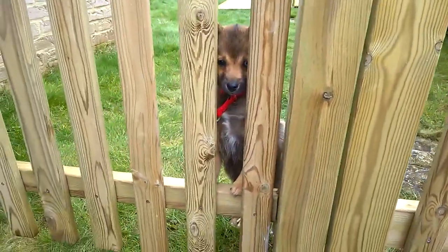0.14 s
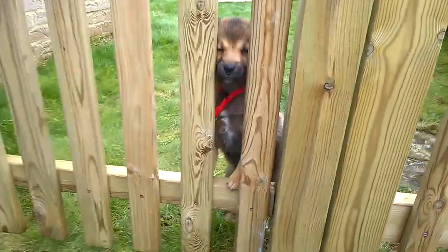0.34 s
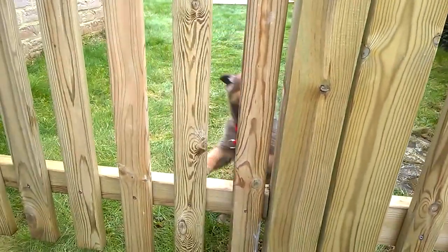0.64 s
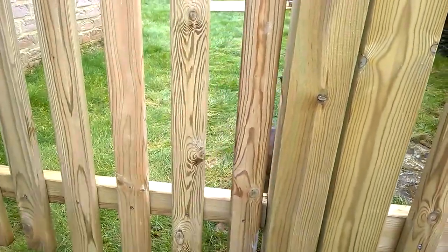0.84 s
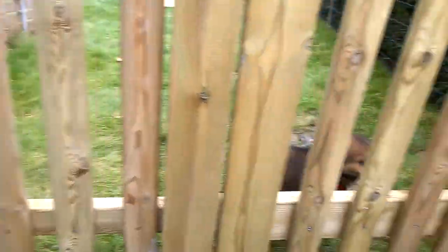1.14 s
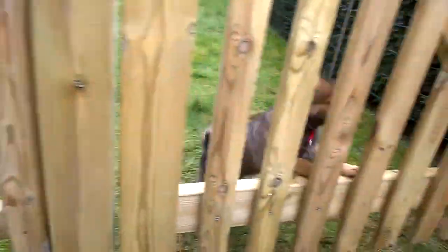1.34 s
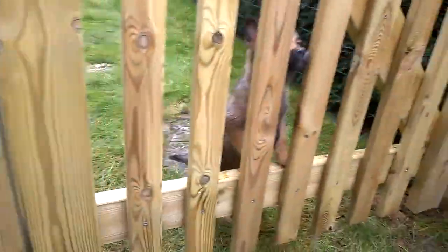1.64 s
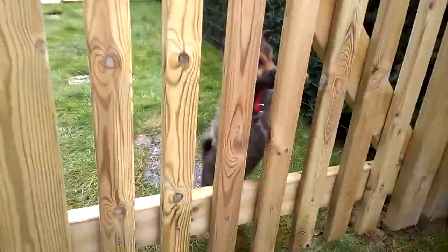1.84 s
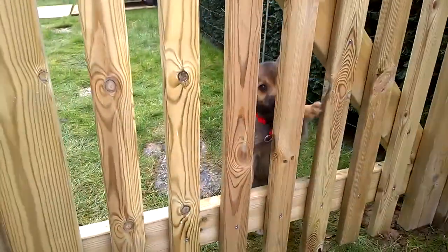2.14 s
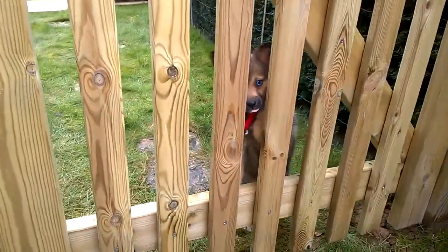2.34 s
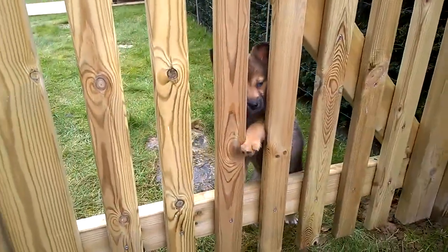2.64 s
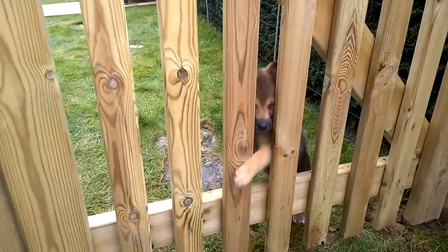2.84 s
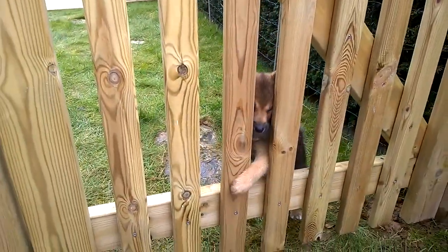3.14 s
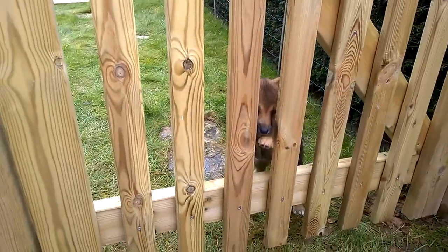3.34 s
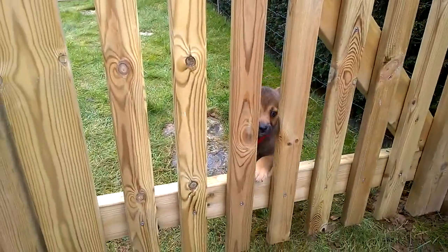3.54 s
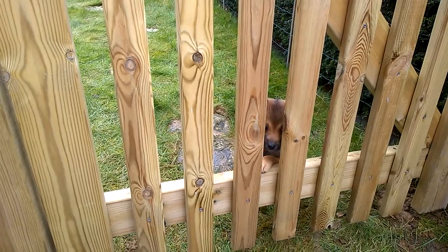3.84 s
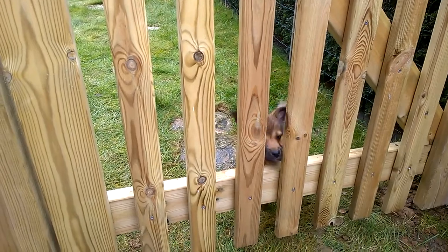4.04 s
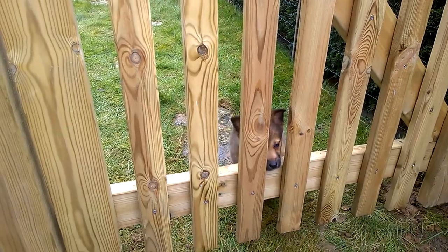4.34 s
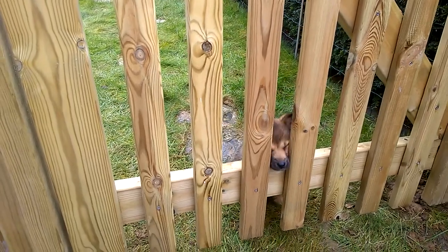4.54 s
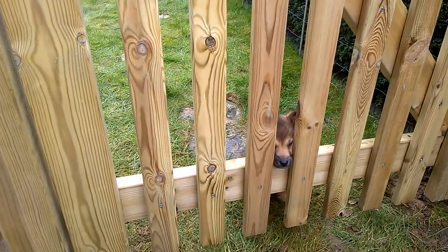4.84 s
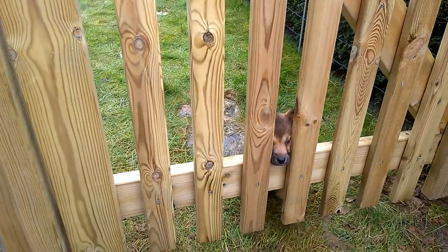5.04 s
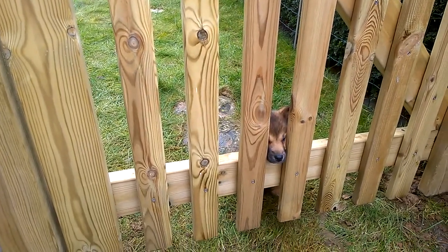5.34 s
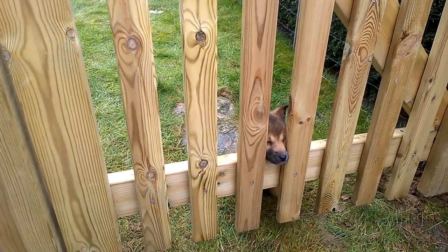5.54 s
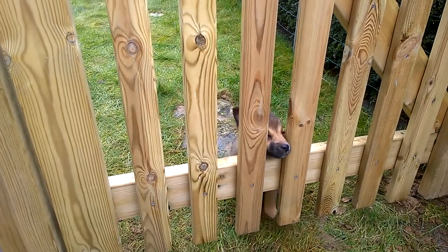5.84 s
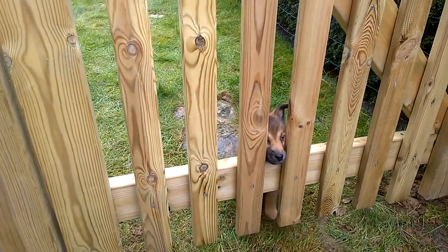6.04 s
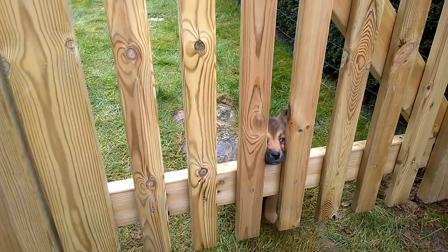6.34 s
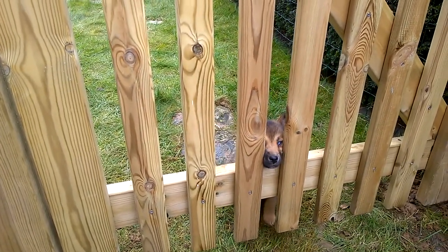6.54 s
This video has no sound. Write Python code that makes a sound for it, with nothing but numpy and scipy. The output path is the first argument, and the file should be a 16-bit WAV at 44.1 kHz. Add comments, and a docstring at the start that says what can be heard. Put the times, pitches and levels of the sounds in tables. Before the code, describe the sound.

Low wind buffeting and bumps on the microphone open the scene with a high, rough puppy yip, followed by a broken yap and a short raspy growl as claws scratch dry wood. Thin quavering whines lead to a second sharp yip. Later come small whimpers, another whine and barely audible nasal whistles, with light fence reflections and calm garden air.

```python
"""A puppy behind a wooden garden fence yips twice, yaps, growls, whimpers, whines and whistles through its nose.
Its voice is summed from harmonics, jittered and mixed with noise puffs where rough; whines and whistles are near-sines.
Its claws scratch the slats in runs of clicks and noise; sparse reflections throw voice and scratches back.
Wind (shaped noise in gusts) and bumps (short pressure swings) rumble on the microphone over faint outdoor noise."""
import sys
import numpy as np
from scipy import signal
from scipy.fft import rfft, irfft, next_fast_len
from scipy.io import wavfile
from scipy.ndimage import uniform_filter1d

SR = 44100
rng = np.random.default_rng(int(sys.argv[2]) if len(sys.argv) > 2 else 0)


def output_pcm(signal):
    """Save a mono or channel-first signal as 16-bit PCM at the path in sys.argv[1].

    Samples are clipped to [-1, 1] before scaling.
    """
    pcm = np.clip(np.atleast_2d(signal).T, -1, 1) * 32767
    wavfile.write(sys.argv[1], SR, np.round(pcm).astype(np.int16))


N = 294662
TIME = np.arange(N) / SR
EDGE_HZ = 15750  # top of the band
SWELL_ROUNDNESS = 1.34  # crest of a cry's level: 1 pointed, 2 a smooth arch

# short growl: t/s, level/dB, mouth opening/factor on the throat resonances
GROWL_CURVES = [(1.325, -54, 1.22), (1.342, -40.5, 1.22), (1.378, -41.5, 1.03), (1.43, -42.5, 0.85),
                (1.475, -39, 0.96), (1.515, -34, 0.947), (1.535, -52, 1.16), (1.558, -38, 1.25),
                (1.582, -66, 1.1)]


def amp(db):
    """Decibels to gain."""
    return 10 ** (np.asarray(db) / 20)


def unit(x):
    """Scales to rms 1."""
    return x / np.sqrt(np.mean(x ** 2) + 1e-20)


def read(points, hz):
    """Reads a spectrum in dB on a log-frequency axis."""
    f, db = np.transpose(points)
    return np.interp(np.log(hz + 1), np.log(f), db)


def colour(x, points):
    """Filters x by a spectrum in dB."""
    size = next_fast_len(len(x) + 2048)
    gain = amp(read(points, np.fft.rfftfreq(size, 1 / SR)))
    return irfft(rfft(x, size) * gain, size)[:len(x)]


def flutter(size, hz):
    """Random motion of rms 1, no faster than about hz."""
    f = np.fft.rfftfreq(size, 1 / SR)
    slow = rfft(rng.standard_normal(size)) / np.sqrt(1 + (f / hz) ** 6)
    return unit(irfft(slow, size))


def steady(x):
    """Holds the short-time rms at 1."""
    return x / np.sqrt(abs(uniform_filter1d(x ** 2, size=500)) + 1e-12)


def add(mix, start_s, sound):
    """Mixes a sound in at start_s."""
    part = mix[max(round(start_s * SR), 0):][:len(sound)]
    part += sound[:len(part)]


def controls(rows):
    """Turns a call's rows into a soft-edged gate and smooth curves."""
    row_s, *columns = np.transpose(rows)
    t = np.arange(row_s[0], row_s[-1], 1 / SR)
    gate = signal.windows.tukey(len(t), 300 / len(t))
    return [gate] + [uniform_filter1d(np.interp(t, row_s, c), size=160) for c in columns]


def note(length_s, crest, first_hz, middle_hz, last_hz, edge_db):
    """One cry: pitch bends in a single arc, level swells to a crest and fades. Gives gate, Hz, dB."""
    u = np.linspace(0, 1, round(length_s * SR))
    bend_hz = middle_hz - (first_hz + last_hz) / 2
    hz = first_hz + (last_hz - first_hz) * u + bend_hz * (1 - (2 * u - 1) ** 2)
    crest = np.clip(crest, .05, .95)
    away = np.maximum((crest - u) / crest, (u - crest) / (1 - crest))
    gate = signal.windows.tukey(len(u), 300 / len(u))
    return gate, hz, edge_db * away ** SWELL_ROUNDNESS


def resonate(x, hz, width_hz):
    """A resonance that follows the curve hz: shift to 0 Hz, low-pass, shift back."""
    turn = np.exp(2j * np.pi * np.cumsum(hz) / SR)
    r = np.exp(-np.pi * width_hz / SR)
    return 2 * (turn * signal.lfilter([1 - r], [1, -r], x / turn)).real


def air(level_db=-51, waver_db=1.1, waver_hz=14):
    """Dull, even outdoor noise with a few narrow humps."""
    # steady spectrum: f/Hz, level/dB
    air_spectrum = [(60, 2), (200, 3.5), (350, -6), (600, -2), (900, 4), (1300, 0), (1600, -2.5),
                    (2100, 0.5), (2430, -20.5), (3000, -19), (3700, -27.5), (6800, -32), (8200, -37.5),
                    (15500, -43)]
    # humps on it: f/Hz, width/Hz, rise/dB
    air_humps = [(2007, 66, 5.25), (4270, 380, 9), (6130, 160, 6.5), (10420, 270, 10)]
    hz = np.fft.rfftfreq(N, 1 / SR)
    humps_db = sum(up_db * np.exp(-((hz - f) / width) ** 2) for f, width, up_db in air_humps)
    db = read(air_spectrum, hz) + humps_db
    noise = unit(irfft(rfft(rng.standard_normal(N)) * amp(db), N))
    return amp(level_db + waver_db * flutter(N, waver_hz)) * noise


def gusting(wander_db=2, wander_hz=9):
    """Wind strength in dB: bell-shaped gusts on a wandering breeze, summed as power."""
    # gusts on the microphone: crest t/s, length/s, level/dB
    gust_rows = [(0.01, 0.11, -23.5), (0.341, .11, -25.5), (0.542, 0.19, -31), (0.668, 0.2, -19),
                 (1.02, 0.29, -29), (1.151, 0.064, -26.5), (1.273, 0.087, -24), (1.391, 0.051, -33),
                 (1.614, .07, -32), (1.74, 0.037, -30.5), (1.933, 0.17, -29), (2.87, 0.041, -37),
                 (3.13, 0.28, -40), (3.379, 0.14, -33.5), (4.25, 0.042, -40), (4.893, 0.38, -46),
                 (5.24, 0.21, -38), (5.406, 0.094, -36), (6.4, 0.11, -38.5), (6.538, 0.13, -37.5)]
    # light air between gusts: t/s, level/dB
    breeze_rows = [(0, -37.5), (1.8, -43), (2.2, -50.5), (2.8, -44.5), (4.6, -46), (5.2, -44), (6.68, -43)]
    breeze_db = np.interp(TIME, *np.transpose(breeze_rows))
    breeze = amp(breeze_db + wander_db * flutter(N, wander_hz))
    gusts = [amp(db) * np.exp(-np.minimum((2 * (TIME - s) / length_s) ** 2, 20))
             for s, length_s, db in gust_rows]
    return 10 * np.log10(breeze ** 2 + sum(gust ** 2 for gust in gusts))


def wind(gust_db=-22, eddy_db=-32, growth=1.59):
    """Lumpy low turbulence; the smaller eddies grow faster than the rumble as a gust rises."""
    # low rumble: f/Hz, level/dB
    rumble_spectrum = [(12, -7), (25, -5.5), (55, 5), (90, -1.5), (130, -11), (200, -23), (300, -49),
                       (500, -63.5), (1000, -92.5)]
    # eddies that strong gusts add: f/Hz, level/dB
    eddy_spectrum = [(60, -12.5), (130, 12.5), (260, 4.5), (450, -11.5), (700, -18), (1200, -24.5),
                     (2500, -69.5)]
    level_db = gusting()
    rumble = colour(rng.standard_normal(N), rumble_spectrum)
    rumble /= np.sqrt(uniform_filter1d(rumble ** 2, size=3500))
    eddies = unit(colour(rng.standard_normal(N), eddy_spectrum))
    eddies *= amp(5.15 * flutter(N, 24))  # lumps
    # growth: eddy dB per dB of wind; eddy_db holds at gust_db
    return amp(level_db) * rumble + amp(eddy_db + growth * (level_db - gust_db)) * eddies


def bumps():
    """A knock or a puff of wind gives one or two slow swings of pressure."""
    # bumps and wind pops: t/s, level/dB, f/Hz
    bump_rows = [(0.318, -14.5, 54), (0.624, -24, 170), (0.662, -11.5, 173), (.721, -22, 335),
                 (0.742, -21.5, 430), (1.136, -22, 110), (1.621, -18, 66), (2.951, -18.5, 80),
                 (4.238, -25, 104), (5.407, -20.5, 50), (5.582, -28.5, 76)]
    out, t = np.zeros(N), np.arange(-SR // 20, SR // 20) / SR
    for s, db, hz in bump_rows:
        swing = np.cos(2 * np.pi * hz * t + .5) / np.cosh(4.16 * hz * t)
        add(out, s + t[0], amp(db) * swing)
    return out


def garden(x, fence_db=-19, fence_t60_s=0.11, yard_db=-25, yard_t60_s=0.22):
    """Quick reflections from the slats, then a faint tail from walls and hedge, thin in the lows and brighter
    around 4.7 kHz."""
    t = TIME[:SR // 2]
    signs = rng.choice([-1., 1.], len(t))
    taps = signs * (rng.random(len(t)) < 2500 / SR) * (t > .002)  # 2500 per s
    near = unit(taps * amp(-60 * t / fence_t60_s))
    far = unit(taps * amp(-60 * t / yard_t60_s) * (t > .018))
    far = colour(far, [(200, -16), (1200, -2), (2400, -0.5), (4700, 10.5), (6000, 0), (14000, -2.5)])
    echo = amp(fence_db) * near + amp(yard_db) * far
    return x + signal.fftconvolve(x, echo / np.sqrt(len(t)))[:N]


def claws(slips_per_s=2200, spread_db=4, catch_db=4, rub_db=-8, catch_s=.0025):
    """Each scratch is a brief catch and a short run of separate slips on dry wood."""
    # claws on the slats, and a small mouth click as the first yip opens at 0.363 s: t/s, level/dB, fading
    # time/s
    scratch_rows = [(0.363, -45, .004), (1.4985, -30, 0.011), (1.5246, -34.5, 0.017), (1.548, -35.5, 0.011),
                    (1.702, -39, 0.029), (1.7483, -48, 0.016), (2.7103, -35, 0.018), (2.7496, -41, 0.017),
                    (3.396, -36.5, 0.023), (3.597, -41, 0.014), (4.666, -42.5, 0.0032)]
    # what a scratched slat gives off: f/Hz, level/dB
    slat_spectrum = [(200, 9.5), (600, 11.5), (1300, 16), (1800, 7.5), (2400, 2.5), (3300, -0.5),
                     (4500, -9.5), (7000, -19.5), (8600, -30.5), (15000, -60.5)]
    out, lead = np.zeros(N), 256  # lead: samples of silence ahead of the filter
    t = TIME[:SR // 6]
    for s, db, fade_s in scratch_rows:
        sizes_db = spread_db * np.minimum(rng.exponential(1, len(t)), 2)
        sizes = rng.standard_normal(len(t)) * amp(sizes_db)
        slips = unit(sizes * (rng.random(len(t)) < slips_per_s / SR))
        # the claw catches for a few milliseconds, then rubs on more faintly
        rub_gain = amp(catch_db) * np.exp(-t / catch_s) + amp(rub_db)
        rub = rng.standard_normal(len(t)) * rub_gain
        scrape = colour(np.pad((slips + rub) * np.exp(-t / fade_s), (lead, 0)), slat_spectrum)
        # energy grows with the length of the scratch
        scrape *= np.sqrt(fade_s * SR / 2) / np.linalg.norm(scrape)
        add(out, s - lead / SR, amp(db) * scrape)
    return out


def growl(flaps_hz=375, unevenness=0.08):
    """Slack folds flap unevenly and let puffs of air into the throat."""
    # throat resonances: f/Hz, width/Hz, level/dB
    throat = [(617, 27, 2.5), (780, 170, -5.5), (1137, 43, 1), (2020, 300, -25)]
    gate, db, mouth = controls(GROWL_CURVES)
    turns = np.cumsum(flaps_hz * (1 + unevenness * flutter(len(db), 80))) / SR
    puffs = rng.standard_normal(len(db)) * (0.49 + np.exp(-(turns % 1) / 0.46))
    voice = sum(amp(up_db) * resonate(puffs, hz * mouth, width_hz) for hz, width_hz, up_db in throat)
    voice = colour(voice, [(200, -10), (500, -1.5), (1400, -5.0), (2600, -14), (8000, -26.0)])
    return gate * amp(db) * steady(voice)


def whistle(length_s, level_db, crest, first_hz, middle_hz, last_hz, jitter=0.014, hiss_db=-15):
    """A thin jet tone in the nose with a little hiss around it."""
    gate, hz, swell_db = note(length_s, crest, first_hz, middle_hz, last_hz, edge_db=-14.5)
    n = len(hz)
    phase = 2 * np.pi * np.cumsum(hz * (1 + jitter * flutter(n, 400))) / SR
    hiss = unit(colour(rng.standard_normal(n), [
        (4500, -25.5), (6500, 9), (8000, 0), (10500, 2), (12000, -24), (15000, -12)]))
    return gate * amp(level_db + swell_db) * (np.sqrt(2) * np.sin(phase) + amp(hiss_db) * hiss)


def whine(length_s, level_db, crest, first_hz, middle_hz, last_hz, quaver, quavers_per_s,
          quaver_fade_s=0.08, jitter=0.0055, second_db=-39, third_db=-45, airy_db=-37):
    """Taut folds behind a nearly shut mouth; the tone frays where the pitch slides fast."""
    gate, hz, swell_db = note(length_s, crest, first_hz, middle_hz, last_hz, edge_db=-5)
    n = len(hz)
    t = TIME[:n]
    # the quaver starts in a dip and settles
    hz = hz * (1 - quaver * np.exp(-t / quaver_fade_s) * np.cos(2 * np.pi * quavers_per_s * t))
    slide_per_s = abs(np.gradient(np.log(hz))) * SR
    fray = jitter + np.minimum(0.0064 * slide_per_s, .05)
    phase = 2 * np.pi * np.cumsum(hz * (1 + fray * flutter(n, 300))) / SR
    tone = np.sin(phase) + amp(second_db) * np.sin(2 * phase) + amp(third_db) * np.sin(3 * phase)
    airy = unit(colour(rng.standard_normal(n), [
        (400, -2), (1200, 10.5), (3500, -6), (5500, -19.5), (7000, 2.5), (9000, -17.0), (15000, -27)]))
    level = amp(level_db + swell_db + 0.36 * flutter(n, 76))
    return gate * level * (np.sqrt(2) * tone + amp(airy_db) * airy)


def yip(gate, hz, first_db, second_db, upper_db, rough, jitter=0.12, jitter_hz=520, shimmer=0.39,
        rasp=1.7, rasp_low_db=-22, uneven_db=0.5, loud_db=-27, softening=0.039, top_hz=6200,
        lock_hz=1250, spray_db=-49):
    """The vocal folds go from clean to chaotic: uneven cycles smear the high harmonics most."""
    # open mouth above the second harmonic: f/Hz, level/dB
    mouth_spectrum = [(1300, -15.5), (2300, 22.5), (2620, 1), (2950, 6), (3350, 8), (3850, -6), (4300, 2.5),
                      (4750, 1), (5150, -9), (5700, -11), (6400, -27.5), (7400, -19), (8500, -43),
                      (12000, -44), (15500, -33)]
    # air that sprays past the teeth: f/Hz, level/dB
    spray_spectrum = [(2500, -9.5), (4300, 6.5), (5500, -6), (6500, -2), (8000, -9), (9200, -20),
                      (10700, -16), (13000, -15), (15500, -8.5)]
    n = len(hz)
    rough = np.clip(rough, 0, 1)
    phase = 2 * np.pi * np.cumsum(hz * (1 + jitter * rough ** 1.25 * flutter(n, jitter_hz))) / SR
    strength = unit(1 + shimmer * rough * flutter(n, 200))

    # rough: lowest tone is pulled to the mouth's first resonance, two pitches at once
    pull_hz = np.minimum(1.5 * rough, 1) * (lock_hz - hz) * np.exp(-((hz - lock_hz) / 190) ** 4)
    pulled_phase = phase + 2 * np.pi * np.cumsum(pull_hz) / SR
    low = amp(first_db) * np.sin(pulled_phase) + amp(second_db) * np.sin(2 * phase)

    # air rushes through in puffs, one to each opening of the folds
    puffs = unit(rng.standard_normal(n) * (1 + 0.61 * np.cos(phase)))

    # softer calls close the folds more gently: harmonics fall off faster; each swells on its own
    slope = .5 + softening * np.clip(loud_db - upper_db, 0, 15)
    stack = np.zeros(n)
    for k in range(3, 13):
        rolloff = (3 / k) ** slope * (k * hz < EDGE_HZ) / np.hypot(1, (k * hz / top_hz) ** 4)
        stack += amp(uneven_db * flutter(n, 60)) * np.cos(k * phase) * rolloff
    upper = steady(colour(unit(stack) + rasp * (rough + 0.11) * puffs, mouth_spectrum))

    effort = np.hypot(amp(first_db), amp(second_db))
    hoarse = unit(colour(puffs, [
        (300, -30.5), (600, -19.5), (850, -4), (1200, 27.5), (1600, 4.5), (2300, -7.5), (3200, -43.5)]))
    hoarse *= rough * amp(rasp_low_db) * effort

    # spray follows the airflow, which changes more slowly than the tone
    airflow = uniform_filter1d(effort, size=1500) / amp(-2)
    spray = amp(spray_db) * airflow ** 0.74 * unit(colour(rng.standard_normal(n), spray_spectrum))
    return gate * (strength * (np.sqrt(2) * low + amp(upper_db) * upper) + hoarse + spray)


def whimper(length_s, level_db, crest, first_hz, middle_hz, last_hz, second_db, rough,
            clean_upper_db=-38, hoarse_upper_db=17.5):
    """A small yip on one arc of pitch; the hoarser it is, the brighter."""
    gate, hz, swell_db = note(length_s, crest, first_hz, middle_hz, last_hz, edge_db=-14)
    db = level_db + swell_db
    return yip(gate, hz, db, db + second_db, db + clean_upper_db + hoarse_upper_db * rough, rough)


def puppy():
    """All the calls: yips on drawn curves, short cries on single arcs, one growl."""
    # loud yip, yap that breaks to a lower pitch, loud yip that clears as it rises:
    # t/s, f/Hz, fundamental/dB, second harmonic/dB, upper harmonics/dB, roughness/0-1 (clipped)
    first_yip = [(0.366, 451, -53.5, -60, -64.5, 0.37), (0.378, 788, -23.5, -30, -34.5, 1.1),
                 (0.387, 1019, -9.5, -33, -27, 0.77), (0.403, 1089, -13.5, -33, -24.5, 0.68),
                 (0.422, 1151, -16.5, -27.5, -22.5, 0.73), (0.435, 1164, -55, -44, -32, 0.72),
                 (0.455, 1085, -45, -49.5, -55, 1.2), (0.474, 1056, -32.5, -46.5, -58, 1.1),
                 (0.492, 990, -57, -45, -49.5, 0.9)]
    yap = [(0.785, 664, -53, -50.5, -60, .3), (0.8, 738, -29, -44, -53.5, 0.48),
           (0.821, 943, -37, -31.5, -44, 0.27), (0.826, 651, -54, -19, -32.5, 0.42),
           (0.833, 664, -61, -17.5, -38, 0.29), (0.84, 693, -64, -30, -43.5, .15),
           (0.856, 720.5, -63, -24.5, -30, 0.32), (0.876, 713.5, -62, -49, -56.5, 0.5),
           (0.9, 655, -63, -35, -77, 0.17), (0.915, 684, -44, -69, -70, .1)]
    second_yip = [(3.42, 1117, -35, -46, -64, 0.03), (3.444, 1121, -10, -36, -35, 0.26),
                  (3.447, 1065, -28.5, -23.5, -29.5, 0.62), (3.455, 1080, -16, -20, -28.5, 0.69),
                  (3.471, 1128, -21, -18.5, -23, 0.51), (3.482, 1176, -15.5, -18.5, -26, 0),
                  (3.497, 1185, -37, -26, -34, 0.14), (3.507, 1268, -15, -40, -34.5, 0),
                  (3.518, 1235, -20, -29, -35, 0.2), (3.527, 1105, -34.5, -53.5, -58, .2),
                  (3.553, 1120, -31.5, -55, -47.5, .3)]
    # whimpers and squeaks: start t/s, length/s, level/dB, crest/0-1, first f/Hz, middle f/Hz, last f/Hz,
    # second harmonic re fundamental/dB, roughness/0-1
    whimper_rows = [ (0.42, 0.025, -19.5, 0.43, 2322, 2339, 2270, -12.5, 0),
                    (0.434, .019, -16, 0.38, 2160, 1927, 1870, -23, 0),
                    (0.561, .075, -38.5, 0.69, 2504, 2504, 2426, -42, 0.1),
                    (1.109, 0.076, -40, 0.16, 842, 809, 830, -3.5, 0.83),
                    (1.839, 0.053, -39.5, 0.05, 690, 788, 850, -24, 0.46),
                    (1.899, 0.065, -33.5, 0.6, 878, 629, 960, -10.5, .25),
                    (2.279, 0.043, -40, 1, 620, 504, 720, -15, 0.57),
                    (3.209, 0.064, -41, 0.74, 2430, 2674, 2610, -16.5, 0.14),
                    (3.261, 0.032, -29, 0.36, 2570, 1880, 1420, -23.5, 0.6),
                    (4.112, 0.05, -32.5, 0.4, 666, 692, 675, 2, 0.19),
                    (4.145, 0.039, -31, 0.33, 675, 628, 730, -6, 0.29),
                    (4.803, 0.043, -32, 0.15, 584, 810, 705, -21, 0.28),
                    (4.829, 0.056, -31, 0.23, 703, 885, 750, -36, 0.25),
                    (5.593, 0.046, -46, 0.55, 2206, 1945, 1380, -30, .3),
                    (5.632, 0.048, -29, 0.58, 1450, 1095, 850, -33, 0.17), ]
    # whines, almost pure: start t/s, length/s, level/dB, crest/0-1, first f/Hz, middle f/Hz, last f/Hz,
    # quaver/share of f, quaver rate/Hz
    whine_rows = [ (1.054, 0.056, -44.5, 0, 1452, 1925, 2020, 0.0039, 14),
                  (1.763, .06, -51, .4, 1137, 1100, 1080, .005, 15),
                  (2.207, 0.055, -45.5, .3, 1183, 1102, 1025, .005, 15),
                  (2.691, .2, -33, 0.8, 1205, 1260, 1098, .085, 13.4),
                  (3.552, 0.077, -24.5, 0, 1370, 1335, 1280, .01, 13),
                  (3.838, 0.026, -42, .45, 1370, 1405, 1434, .005, 15),
                  (3.915, 0.22, -33, 0.8, 1055, 1200, 1266, 0.096, 20.6),
                  (4.655, 0.051, -34.5, 0.4, 1197, 1205, 1252, .005, 17),
                  (4.721, 0.071, -39.5, 0.55, 1254, 1262, 1283, .005, 22),
                  (4.784, .028, -32, .68, 1250, 1158, 1020, .005, 15), ]
    # nose whistles: start t/s, length/s, level/dB, crest/0-1, first f/Hz, middle f/Hz, last f/Hz
    whistle_rows = [ (0.44, 0.056, -48, 0.13, 6650, 6320, 6680), (0.491, .052, -53.5, .7, 6750, 7500, 7950),
                    (0.614, 0.047, -54, .35, 7370, 7300, 7100), (1.815, .037, -71, 0.54, 7650, 7850, 8250),
                    (3.635, 0.042, -48.5, 0.66, 7700, 7220, 7470),
                    (4.879, 0.048, -58.5, 0.43, 6860, 6900, 7000),
                    (5.568, 0.058, -58, 0.37, 7960, 8330, 8400),
                    (5.66, 0.037, -48.5, .38, 7400, 6750, 6700), (6.097, .225, -51, 0.67, 7880, 7840, 8000),
                    (6.332, 0.049, -49.5, 0.54, 8400, 6760, 6800), ]
    out = np.zeros(N)
    for rows in first_yip, yap, second_yip:
        add(out, rows[0][0], yip(*controls(rows)))
    for voice, calls in (whimper, whimper_rows), (whine, whine_rows), (whistle, whistle_rows):
        for start_s, *call in calls:
            add(out, start_s, voice(*call))
    add(out, GROWL_CURVES[0][0], growl())
    return out


def scene():
    """Puppy and claws echoed by the garden, plus outdoor air, wind and bumps on the microphone."""
    return (garden(puppy() + claws()) + air() + wind() + bumps())[None]


def record(dry):
    """The recorder's band limit: a linear-phase low-pass at EDGE_HZ."""
    lowpass = signal.firwin(511, EDGE_HZ, window=("kaiser", 9), fs=SR)
    return signal.oaconvolve(dry, lowpass[None], "same")


dry = scene()
out = record(dry)
output_pcm(out)
```